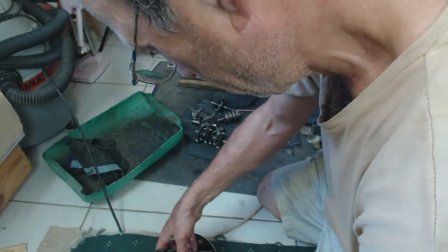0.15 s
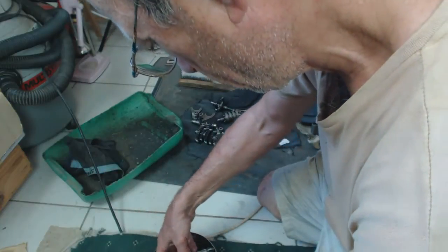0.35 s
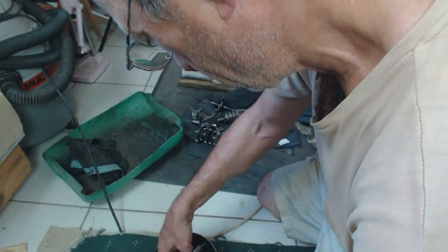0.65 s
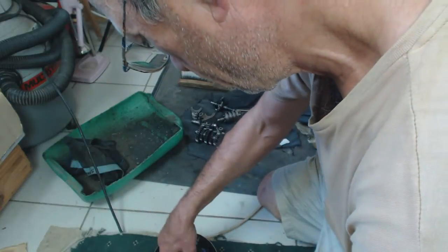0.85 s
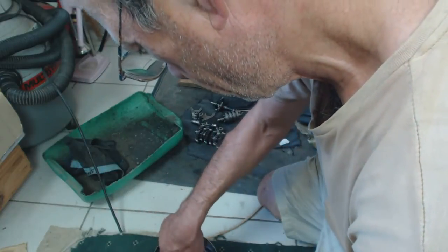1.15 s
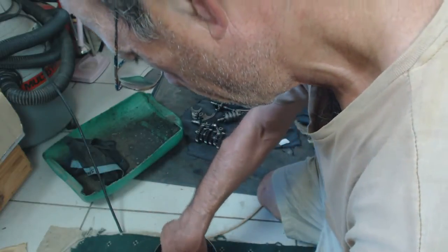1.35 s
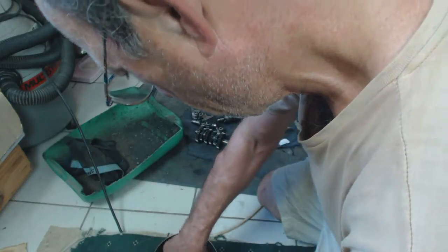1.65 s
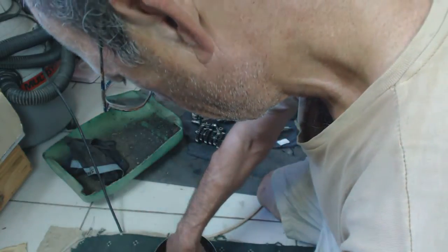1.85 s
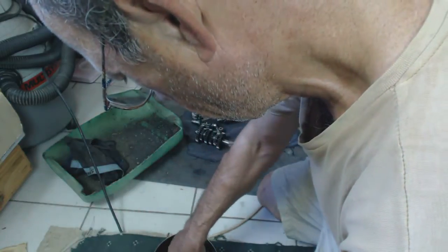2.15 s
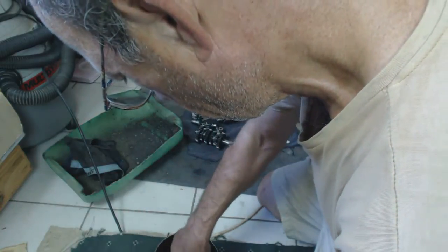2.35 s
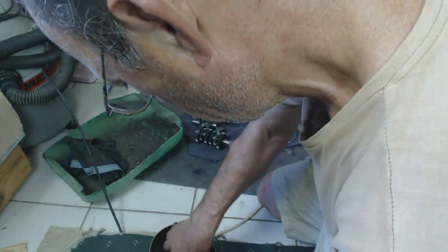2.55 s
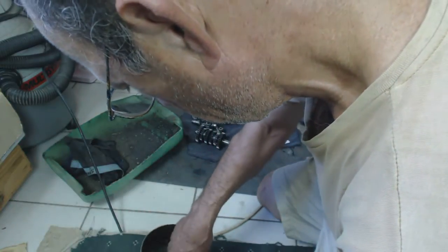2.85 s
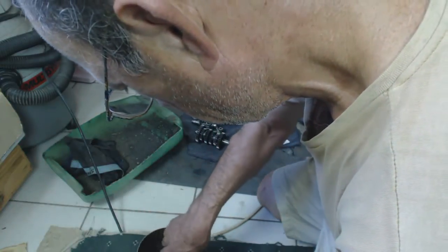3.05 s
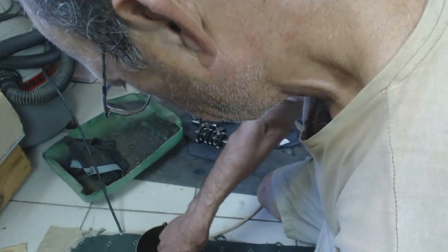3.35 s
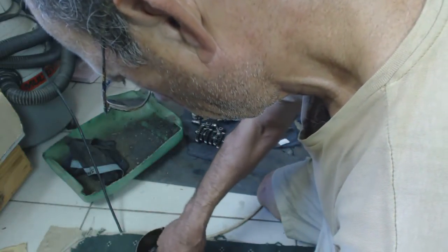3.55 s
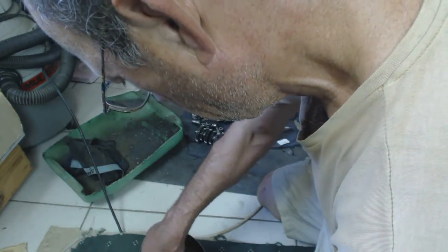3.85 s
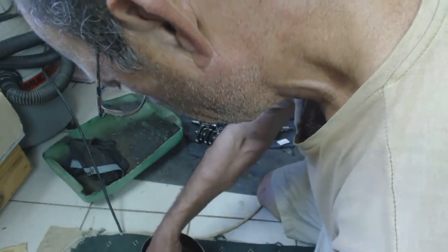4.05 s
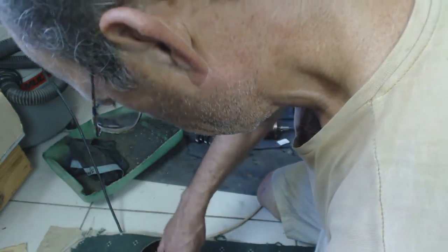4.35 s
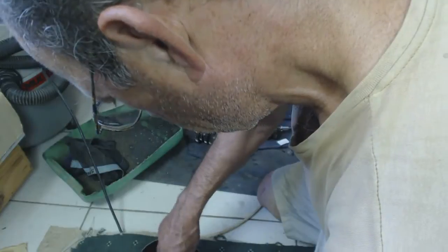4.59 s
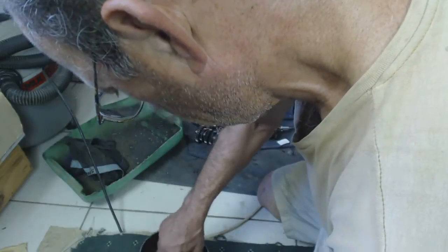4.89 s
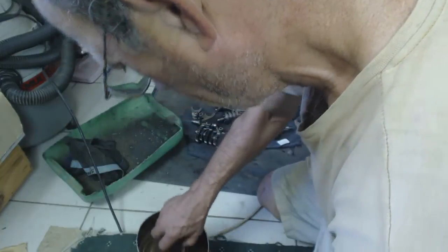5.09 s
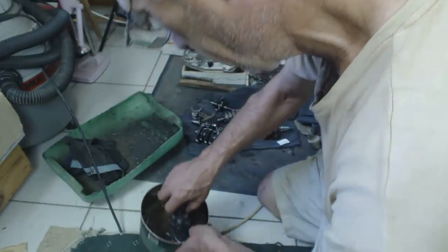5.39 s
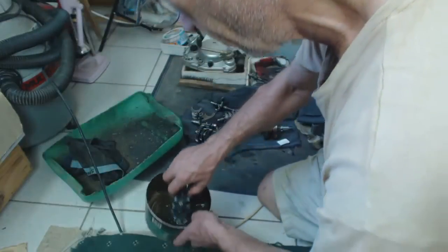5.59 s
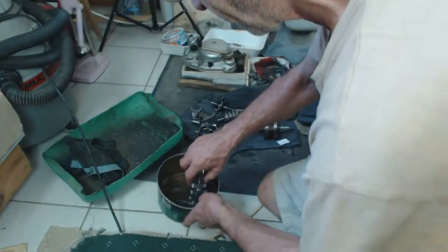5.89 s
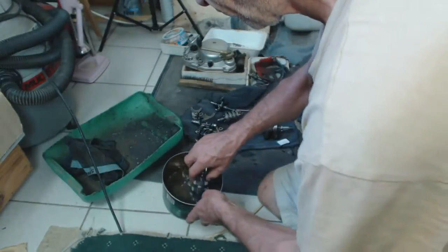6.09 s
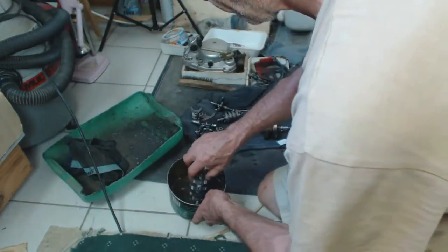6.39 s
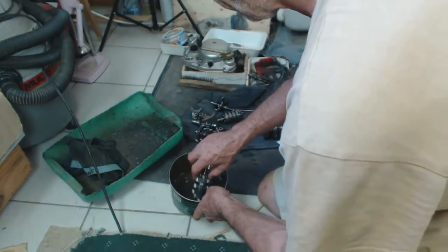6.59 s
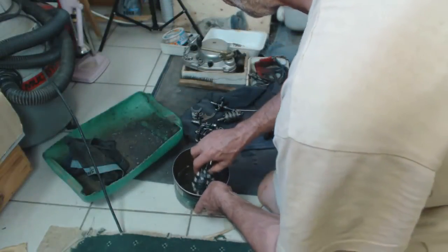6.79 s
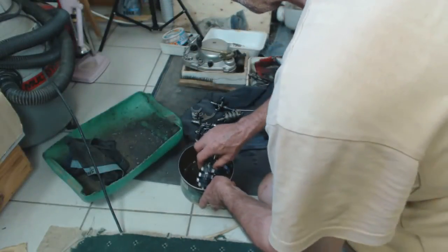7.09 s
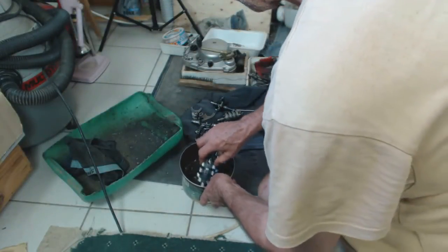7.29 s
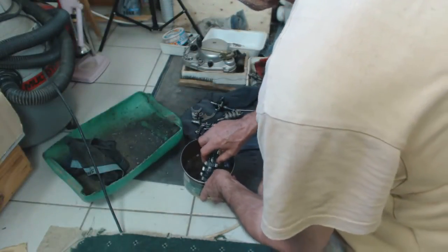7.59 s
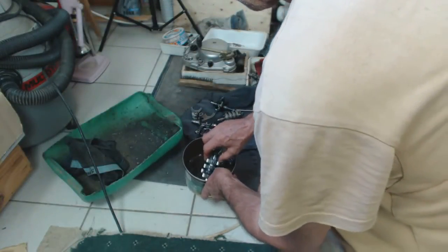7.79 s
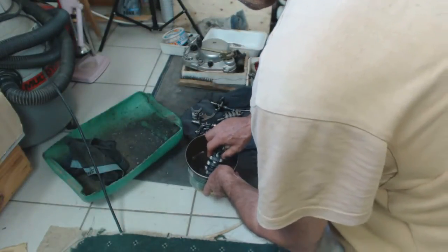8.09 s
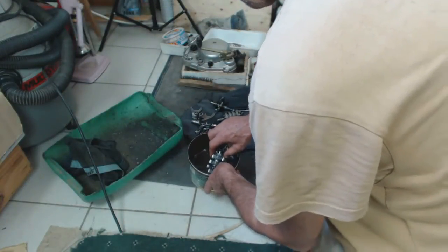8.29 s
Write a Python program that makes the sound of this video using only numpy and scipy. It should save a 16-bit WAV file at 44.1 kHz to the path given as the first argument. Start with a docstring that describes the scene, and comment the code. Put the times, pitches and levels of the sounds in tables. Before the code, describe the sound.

Hard metallic clanks and quick rattles ring from a metal pot, its tone bending with sloshing fluid, above a very faint steady motor tone.

```python
"""Steel gear shafts knock against a metal pot of cleaning fluid, in a small tiled workshop.
Each blow is a train of contacts: noise and decaying steel modes, coloured by level and brightness.
The pot's wall tones share the energy of blows and scrapes, and bend as it tips and the fluid swings.
Stick-slip skids, hissing scrapes, low booms and bubbling drips join in; dense reflections follow.
Underneath lie shaped noise, the hum and hiss of the room, and the sine tones of a small, faint motor."""
import sys
import numpy as np
from scipy import signal
from scipy.fft import rfft, irfft, next_fast_len
from scipy.io import wavfile
from scipy.ndimage import uniform_filter1d

SR = 44100
rng = np.random.default_rng(int(sys.argv[2]) if len(sys.argv) > 2 else 0)


def wav_out(sig):
    """Save sig, one row per channel (or a flat mono array), as 16-bit PCM at SR to the path in sys.argv[1]."""
    wavfile.write(sys.argv[1], SR, np.round(np.clip(np.atleast_2d(sig).T, -1, 1) * 32767).astype(np.int16))


N = 372023  # length of the scene (samples)
T = np.arange(int(.7 * SR)) / SR  # time axis of a single event (s)

# shaft against pot: [t/s, steel level/dB, wall level/dB, brightness/dB, rattle decay time T60/s];
# a decay time of zero or less means no audible rebound
BLOWS = [(0.3466, -38, -40, 7.5, 0.5), (0.4527, -39, -35.5, -2, 0.6), (1.6786, -5.5, -10.5, 3, 0.22),
         (1.732, -10.5, -15.5, -3, 0.17), (1.822, -6, -22.5, -6.5, 0.1), (1.8323, -15, -38, -10, -0.1),
         (1.8633, -22, -24, 10, -0.2), (1.8862, -18.5, -25.5, -7.5, 0.16),
         (2.0695, -32.5, -46, -1.5, -0.15), (2.1835, -10, -22.5, -1, -0.06),
         (2.1947, -11.5, -19.5, 1.5, -0.05), (2.238, -18.5, -20.5, 4, 0), (2.5276, -27.5, -30, -5.5, 7.5),
         (2.5675, -11, -25.5, -0.5, 0.04), (2.6666, -24.5, -29.5, -2.5, 0.16),
         (2.7846, -23, -14.5, 8.5, -0.6), (2.7917, -12, -11, 6.5, 0.15), (2.9623, -25.5, -24.5, 3.5, 0.12),
         (3.054, -18, -26.5, -16, -0.14), (3.1414, -22.5, -31.5, 12.5, 0.12),
         (3.2054, -25, -25.5, -3, -0.3), (3.237, -29, -39, 7, 0.16), (3.3352, -29.5, -29.5, -3.5, .06),
         (3.3804, -31.5, -28.5, 1, 0.2), (3.4208, -12.5, -26.5, 1, 0.06), (3.4443, -23.5, -20.5, -10, 0),
         (3.5048, -22.5, -23.5, -11, 0.14), (3.6321, -11, -16.5, -9, 0.08), (3.661, -16.5, -22, -10.5, 0),
         (3.7825, -37, -41.5, -8.5, 0.16), (3.9555, -51, -47, 1, 1), (4.0545, -32, -31.5, -4, -0.25),
         (4.1695, -37.5, -38, -6, 0.2), (4.2327, -18.5, -28, -5, -1.24), (4.2643, -21, -26.5, -25, 0.2),
         (4.9947, -35, -45.5, 2.5, 0.1), (5.0405, -21.5, -29, 2, 0.08), (5.116, -32.5, -24.5, 11.5, 0.2),
         (5.2572, -21, -11.5, 2, 0.17), (5.459, -25.5, -24, 0.5, -0.77), (5.6394, -53.5, -45, -3, 0.1),
         (5.745, -53, -55, 0, 1.5), (5.942, -41.5, -66, 7.5, -0.3), (6.1285, -45.5, -60.5, 8, -0.3)]
# wet steel rubs or drags along the pot: [t/s, length/s, hiss level/dB, wall tone level/dB]
SCRAPES = [(0.051, 0.024, -63.5, -85), (0.395, 0.15, -80, -53), (0.789, .23, -63.5, -68.5),
           (0.886, 0.041, -79, -54.5), (1.386, 0.29, -71, -80), (1.939, 0.17, -57, -58),
           (2.375, 0.069, -52.5, -53.5), (2.60, 0.21, -63, -46), (2.904, 0.068, -42.5, -66),
           (2.99, 0.073, -58, -68), (3.108, 0.11, -45, -38.5), (3.3, 0.19, -75, -35),
           (4.022, 0.15, -55.5, -55), (4.217, 0.067, -51, -34.5), (4.397, .037, -56, -67),
           (5.255, 0.028, -55, -16), (5.876, 0.21, -65, -63.5), (6.024, .12, -77, -58)]
# spectrum of rubbing: [f/Hz, level/dB]
RUB_SPECTRUM = [(40, -32.5), (200, -11.5), (700, -0.5), (1500, 8), (3000, -4.5), (5000, -4), (7000, -2),
                (10000, -12), (13000, -29)]


def amp(db):
    """Level: an amplitude ratio is ten to the power of dB / 20."""
    return 10 ** (np.asarray(db) / 20)


def evened(x, size=None):
    """Rms normalisation: scales the first size samples (or all) to an rms of 1."""
    return x / np.sqrt(np.mean(x[..., :size] ** 2) + 1e-20)


def read(points, hz):
    """Logarithmic pitch scale: interpolates a table along log frequency."""
    f, value = np.transpose(points)
    return np.interp(np.log(hz + 1), np.log(f + 1), value)


def dying(t60, t=T):
    """Exponential decay: the amplitude falls by 60 dB in t60 seconds."""
    return np.exp(-np.log(1000) * t / np.maximum(t60, 1e-4))


def add(mix, s, sound):
    """Superposition: lays a sound into every channel of the mix at time s."""
    part = mix[..., max(round(s * SR), 0):][..., :len(sound)]
    part += sound[:part.shape[-1]]


def coloured(x, *spectra):
    """Minimum-phase filtering: a causal filter whose gain is the sum of the given dB spectra."""
    n = next_fast_len(len(x) + 4096)
    hz = abs(np.fft.fftfreq(n, 1 / SR))
    log_gain = np.log(amp(sum(read(s, hz) for s in spectra)))
    response = np.exp(np.conj(signal.hilbert(log_gain)))  # the phase follows from the log gain
    return np.fft.ifft(np.fft.fft(x, n) * response).real[:len(x)]


def background(level_db=-61.5, apart=0.15, whine_db=0, waver=0.00052):
    """Stationary noise and slow frequency modulation: room hum and hiss, and a wavering motor whine."""
    # broad spectrum of the room: [f/Hz, relative level per Hz/dB]
    air_spectrum = [(18, -74), (30, -33.5), (176, -2.5), (200, -4.5), (274, -7), (304, -2), (364, -10),
                    (538, -11.5), (978, -14.5), (1370, -13.5), (1970, -20.5), (6700, -32), (11900, -36),
                    (13500, -36), (15000, -39)]
    # narrow humps in the background noise: [f/Hz, width/Hz, height/dB]
    noise_humps = [(209, 6.1, 11), (254, 21, 5), (286, 13, 7), (6700, 86, 18), (13500, 250, 7.5)]
    # steady tones of the motor: [f/Hz, level/dB]
    whine_tones = [(1061, -84), (1297, -72.5), (1416, -67.5), (1534, -76.5), (1653, -80.5), (1890, -80.5),
                   (8732, -98.5), (10950, -98)]
    hz, t = np.fft.rfftfreq(N, 1 / SR), np.arange(N) / SR
    humps_db = sum(db / (1 + (2 * (hz - f) / width) ** 2) for f, width, db in noise_humps)
    shape_db = read(air_spectrum, hz) + humps_db
    mid, side = evened(irfft(rfft(rng.standard_normal((2, N))) * amp(shape_db), N))
    drift = evened(irfft(rfft(rng.standard_normal(N)) * (hz < 6), N))
    clock = t + waver * np.cumsum(drift) / SR  # one common clock, so all the tones waver together
    whine = np.zeros(N)
    for f, db in whine_tones:
        whine += amp(db) * np.sqrt(2) * np.sin(2 * np.pi * (f * clock + rng.random()))
    air = np.array([mid + apart * side, mid - apart * side])
    return amp(level_db) * air + amp(whine_db) * whine


def room(x, wet_db=-7, apart=0.2):
    """Reverberation: dense reflections off tiles and clutter, nearly the same at both microphones."""
    # reverberation time: [f/Hz, T60/s]
    reverb_times = [(150, 1), (500, .38), (1400, 0.4), (4000, .40), (9000, 0.25), (14000, 0.62)]
    reflections_per_s, first_s = 4000, .004
    struck = rng.random((2, len(T))) < reflections_per_s / SR
    taps = rng.standard_normal((2, len(T))) * struck * (T > first_s)
    hz, t, z = signal.stft(taps, SR, nperseg=256)
    decay = dying(read(reverb_times, hz)[:, None], t)  # each frequency fades at its own pace
    mid, side = signal.istft(z * decay, SR, nperseg=256)[1]
    tail = np.array([mid + apart * side, mid - apart * side]) / np.linalg.norm(mid)
    return x + amp(wet_db) * signal.fftconvolve(x, tail, axes=1)[:, :N]


def trickle(count=7):
    """Slowing drainage: small drops run off the lifted shafts, as (s, dB, bubble Hz)."""
    start_s, first_gap_s, gap_growth, gap_spread = 4.8, .045, 1.6, .5
    start_db, fade_db_per_s = -47, 13
    middle_hz, spread_octaves = 4940, .5
    wait, size = rng.uniform(-1, 1, (count, 2)).T
    gaps = first_gap_s * gap_growth ** np.arange(count) * (1 + gap_spread * wait)
    age = np.cumsum(gaps) - gaps[0]
    bubble_hz = middle_hz * 2 ** (spread_octaves * size)
    return list(zip(start_s + age, start_db - fade_db_per_s * age, bubble_hz))


def drips(rise=0.2, splash_db=-9, splash_t60=0.033):
    """Bubble resonance: a tone that rises as it dies, in a splash of about the same pitch."""
    # the larger drops fall back into the fluid: [t/s, level/dB, bubble f/Hz]
    large_drops = [(4.150, -32.5, 7440), (4.170, -30, 3310), (4.206, -35, 2310), (4.419, -34.5, 4040),
                   (4.509, -37, 6550), (4.767, -39.5, 1010), (5.651, -36.5, 2106), (6.133, -40.5, 3480),
                   (6.283, -48, 4580), (6.398, -49, 7540)]
    out = np.zeros((2, N))
    for s, db, hz in list(large_drops) + trickle():
        life = dying(42 / hz)  # 60 dB in about 42 cycles
        bubble = life * np.sin(2 * np.pi * np.cumsum(hz * (1 + rise * (.5 - life))) / SR)
        around_hz = [(hz / 3, -25), (hz, 0), (hz * 2, -14), (hz * 3, -30)]
        spray = coloured(rng.standard_normal(len(T)), around_hz, RUB_SPECTRUM)
        splash = amp(splash_db) * evened(spray) * dying(splash_t60)
        onset = 1 - dying(0.005)
        add(out, s, amp(db) * (bubble + splash) * onset)
    return out


def scrapes(catches_per_s=5000, modes_db=-46):
    """Friction noise: tiny catches of uneven size hiss and stir the steel modes."""
    out = np.zeros((2, N))
    for s, length, hiss_db, _ in SCRAPES:
        uneven_db = 3.5 * np.minimum(rng.exponential(1, len(T)), 3)
        size = amp(uneven_db) * rng.standard_normal(len(T))
        caught = rng.random(len(T)) < catches_per_s / SR
        stroke = np.sin(np.pi * np.minimum(T / length, 1))
        catches = size * caught * stroke
        rub = catches + amp(modes_db) * signal.fftconvolve(catches, steel_ring())[:len(T)]
        add(out, s, amp(hiss_db) * evened(coloured(rub, RUB_SPECTRUM), size=int(length * SR)))
    return out


def skids(jitter=0.38, fall_db=6, overtone_db=-13, grit_db=0, ring_db=-19, ring_t60=0.14):
    """Stick-slip: a few cycles of chatter stop dead and leave the shaft ringing softly."""
    # a shaft skids and chatters on the wall: [t/s, level/dB, chatter f/Hz, length/s]
    chatters = [(1.677, -12, 3480, 0.0051), (1.801, -25, 1420, 0.017), (1.821, -22.5, 3525, 0.014),
                (2.002, -37, 1480, .034), (2.1326, -20.5, 1432, 0.014), (2.174, -27, 1402, .023),
                (2.194, -24, 3400, .011), (2.22, -23, 1367, 0.0092), (2.237, -18.5, 1394, 0.0049),
                (2.5658, -13, 1415, 0.0078), (3.4216, -14.5, 1454, 0.0086), (4.242, -29, 1330, 0.054)]
    # a skid hardly moves the pot as a whole, so its bass is weak: [f/Hz, level/dB]
    weak_bass = [(50, -18), (300, -5.5), (900, 0)]
    out = np.zeros((2, N))
    for s, db, hz, length in chatters:
        wobble, grit = rng.standard_normal((2, len(T)))
        phase = 2 * np.pi * np.cumsum(hz * (1 + jitter * uniform_filter1d(wobble, 20))) / SR
        overtones = sum(amp(-fall_db * k) * np.sin((k + 2) * phase) for k in range(4))
        edge = evened(coloured(overtones, RUB_SPECTRUM))
        edge = edge + amp(grit_db) * evened(coloured(grit, RUB_SPECTRUM))
        grip = np.clip((length - T) / 0.0014, 0, 1) * (1 - dying(0.0035))
        ring = amp(ring_db) * dying(ring_t60)
        chatter = (grip + ring) * np.sqrt(2) * np.sin(phase) + grip * amp(overtone_db) * edge
        add(out, s, amp(db) * coloured(chatter, weak_bass))
    return out


def booms(t60=.16, rise=.012):
    """Damped resonance: heavy blows and bumps on the tiles sound a low, short tone of the base."""
    # the pot's base booms: [t/s, level/dB, f/Hz]
    base_tones = [(0.347, -49, 371), (0.454, -47, 362), (1.732, -34, 396), (2.184, -30, 389),
                  (2.787, -26, 385), (5.114, -35, 371.8), (5.255, -33, 242.6), (5.459, -42, 364.3)]
    out = np.zeros((2, N))
    for s, db, hz in base_tones:
        tone = np.sqrt(2) * np.sin(2 * np.pi * hz * T)
        add(out, s, amp(db) * tone * dying(t60) * (1 - dying(rise)))
    return out


def wall_ring(push_db=-4, rise=0.0031):
    """Energy sharing among modes: blows and rubbing feed the wall tones, which glide with the fluid."""
    # the lowest wall tones: [standing f/Hz, standing level/dB, tipped f/Hz, tipped level/dB,
    # share of the slosh that the tipped tone follows/1]
    wall_tones = [(628.6, -18, 554, 1.5, 1), (715, 2.5, 724, 0, .3), (770, -15.5, 823, -1.5, .28),
                  (868, -15, 790, -3, 0.046), (1006, -26.5, 985, -5, 1)]
    # the pot is tipped, then set down: [t/s, tip/0-1]
    tip_curve = [(2.48, 0.01), (2.55, 1), (5.65, 1), (5.95, 0.03)]
    # the fluid swings to and fro and bends the tones of the tipped pot: [t/s, full bend/Hz]
    slosh_curve = [(2.578, -105), (2.68, -43), (2.829, 84), (2.97, -20.5), (3.18, -62.5), (3.349, -8.5),
                   (3.501, 55), (3.63, 3), (3.8, 0), (4.25, 76.5), (5.029, -35), (5.199, 12.5), (5.36, 3),
                   (5.462, -85), (5.65, -54)]
    standing_t60, tipped_t60 = .27, 0.17  # a tipped pot sheds its tones sooner (s)
    # bent down, the upper tones ring most; bent up, the lower
    slosh_tilt = -.04  # dB from tone to tone per Hz of full bend
    ripple_depth, ripple_hz = 0.52, 32

    tip, slosh = (np.interp(np.arange(N) / SR, *np.transpose(curve)) for curve in (tip_curve, slosh_curve))
    tip = np.clip(tip, 0, 1)

    def blend(standing, tipped):
        """Linear interpolation: from the standing to the tipped pot."""
        return standing + tip * (tipped - standing)

    t60 = blend(standing_t60, tipped_t60)

    def fade(s):
        """Energy decay: energy falls as amplitude squared, after a short rise."""
        return dying(t60[int(s * SR)]) ** 2 * (1 - np.exp(-T / rise))

    energy = np.zeros(N)
    for s, _, wall_db, _, _ in BLOWS:
        add(energy, s, amp(wall_db + push_db) ** 2 * fade(s))
    for s, length, _, wall_db in SCRAPES:
        push = np.sin(np.pi * np.minimum(T / length, 1)) ** 2
        stroke = abs(signal.fftconvolve(push, fade(s)))
        add(energy, s, amp(wall_db) ** 2 * stroke / stroke.max())

    tones, shares = [], []
    for k, (standing, standing_db, tipped, tipped_db, follows) in enumerate(wall_tones):
        tones.append(blend(standing, tipped + follows * slosh))
        shares.append(amp(blend(standing_db, tipped_db + slosh_tilt * slosh * k)))
    shares = np.array(shares) / np.linalg.norm(shares, axis=0)  # the squares sum to 1

    narrow = np.exp(-(np.fft.rfftfreq(N, 1 / SR) / ripple_hz) ** 2)
    ring = np.zeros(N)
    for hz, share in zip(tones, shares):
        # ripples shake each tone in amplitude and phase
        a, b = ripple_depth * evened(irfft(rfft(rng.standard_normal((2, N))) * narrow, N))
        phase = 2 * np.pi * np.cumsum(hz) / SR
        ring += share * ((1 + a) * np.sin(phase) + b * np.cos(phase))
    return np.sqrt(2 * energy) * ring


def steel_ring(spot_db=3, t60=0.11, grip=0.0028):
    """Modal synthesis: the point of contact weights the modes anew and the grip detunes them a little."""
    # higher modes of pot and shafts: [f/Hz, relative level/dB]
    steel_modes = [(363, 0), (393, 1), (442, -2), (1187, 1), (1265, 0), (1319, 0), (1378, 2), (1422, 6),
                   (1523, 1), (2169, 4), (2277, -1), (2430, 3), (2810, 1), (2859, 0), (3015, 0), (3159, 2),
                   (3278, 2), (3359, 6), (3470, 4), (3941, 1), (4032, 2), (4215, 0), (4753, 2), (4813, 2),
                   (5819, 2), (6691, 3), (6729, 2), (7350, 2), (8732, 2), (10131, 3)]
    hz, db = np.transpose(steel_modes)[:, :, None]
    weight = amp(db + spot_db * rng.standard_normal(hz.shape)) * rng.choice([-1, 1], hz.shape)
    hz = hz * (1 + grip * rng.standard_normal(hz.shape))
    modes = (weight * np.sin(2 * np.pi * hz * T)).sum(0)
    return evened(modes * dying(t60), size=900)


def rattle(t60, count=5):
    """Repeated impact: the first contact and its ever weaker rebounds, as (delay s, gain)."""
    typical_gap_s, gap_spread = .0105, .15
    gaps = typical_gap_s * np.exp(gap_spread * rng.standard_normal(count))
    delays = np.cumsum(gaps) - gaps[0]
    return zip(delays, dying(t60, delays))


def blows(tick_db=17, crack_db=1, dense_db=-10, dense_t60=0.14, modes_db=-15.0):
    """Impact excitation: a tick, a crack of gear teeth, a wash of close modes and the steel modes."""
    # colour of a blow: [f/Hz, level/dB]
    clash_spectrum = [(30, -15.5), (90, -6), (200, 9), (380, 12.5), (560, 8), (900, 12), (1400, 8),
                      (2100, -0.5), (3400, -10), (4200, -4.5), (7300, 4), (8500, -4), (10500, -6),
                      (12500, -39)]
    # centres of the five bands, thud to sizzle: [f/Hz]
    band_centres = [300, 750, 1400, 3200, 8000]
    # band offsets (dB): the body goes with the wall, the upper bands with the steel, the thud with both
    thud_db, body_db, clang_db, clash_db, sizzle_db = -13, -1.5, -5, 3.5, -13
    clash_brightens = 0.3  # share of the brightness that reaches the clash
    crack_t60 = .024  # s

    out = np.zeros((2, N))
    contact = 1 - np.exp(-(T / .0008) ** 2)
    crack_and_wash = np.hypot(amp(crack_db) * dying(crack_t60), amp(dense_db) * dying(dense_t60))
    for s, steel_db, wall_db, bright_db, rattle_t60 in BLOWS:
        blow, modes = np.zeros(len(T)), amp(modes_db) * steel_ring()
        for delay, gain in rattle(rattle_t60):
            hit = (crack_and_wash * rng.standard_normal(len(T)) + modes) * contact
            hit[np.argmax(contact > .5)] -= amp(tick_db)  # the film of fluid gives way and steel meets steel
            add(blow, delay, gain * hit)
        bands_db = [(wall_db + steel_db) / 2 + thud_db,
                    wall_db + body_db,
                    steel_db + clang_db,
                    steel_db + clash_db + clash_brightens * bright_db,
                    steel_db + sizzle_db + bright_db]
        add(out, s, coloured(blow, clash_spectrum, list(zip(band_centres, bands_db))))
    return out


def scene():
    """Superposition: the work in the pot, heard in the room over its steady background."""
    # each band reaches the two microphones a little unequally: [f/Hz, left-right level difference/dB]
    lean_table = [(60, -4), (200, 3.5), (550, 2), (1100, 0.5), (1500, -0.5), (2200, -0.5), (3500, -2),
                  (5000, 3), (8000, .5), (14000, -1)]
    work = room(blows() + wall_ring() + booms() + skids() + scrapes() + drips())
    lean_db = read(lean_table, np.fft.rfftfreq(N, 1 / SR))
    work = irfft(rfft(work) * amp([lean_db / 2, -lean_db / 2]), N)
    air_lean_db = -0.3  # the background comes slightly from the right
    return work + background() * amp([[air_lean_db / 2], [-air_lean_db / 2]])


def record(dry):
    """Band limiting: full-scale clipping, then a linear-phase low-pass."""
    edge_hz = 15200
    low_pass = signal.firwin(511, edge_hz, window=("kaiser", 9), fs=SR)
    return signal.oaconvolve(np.clip(dry, -1, 1), low_pass[None], "same")


dry = scene()
out = record(dry)
wav_out(out)
```